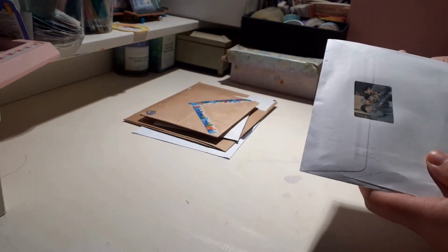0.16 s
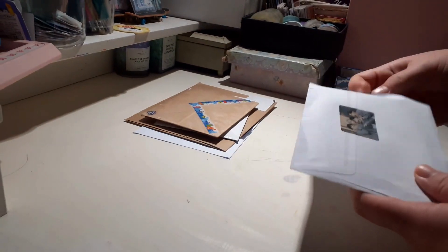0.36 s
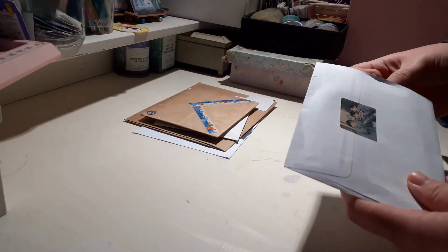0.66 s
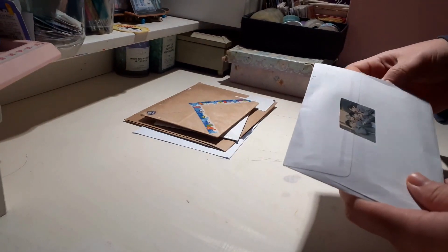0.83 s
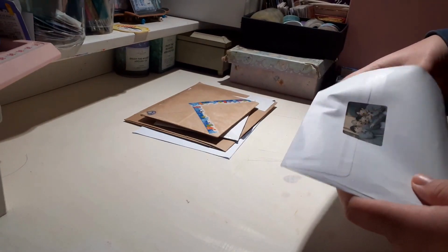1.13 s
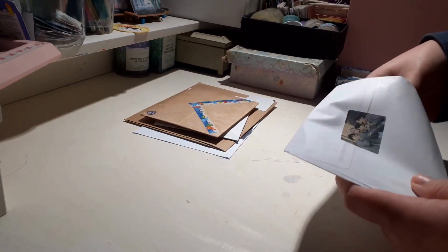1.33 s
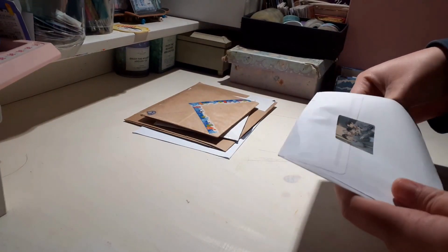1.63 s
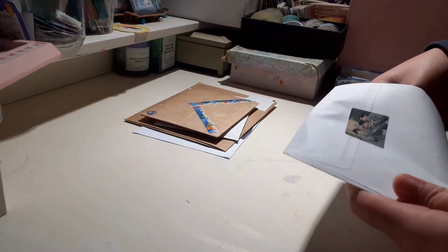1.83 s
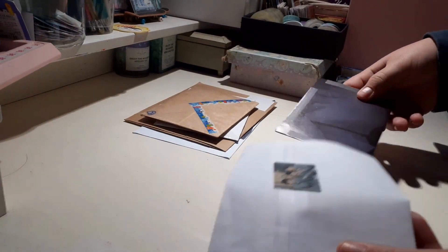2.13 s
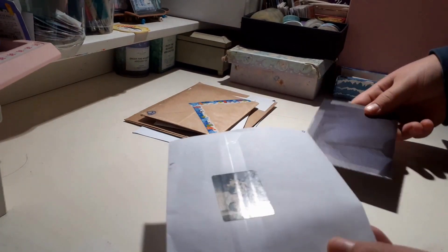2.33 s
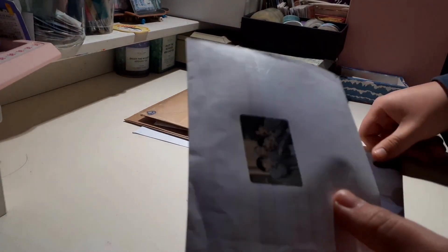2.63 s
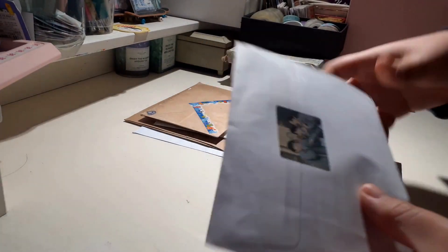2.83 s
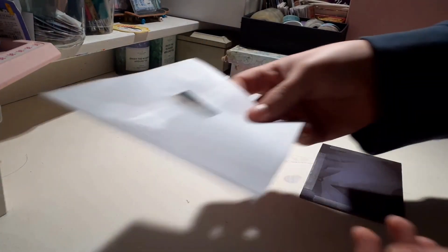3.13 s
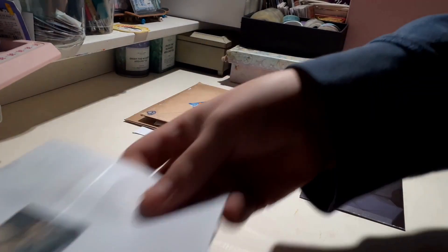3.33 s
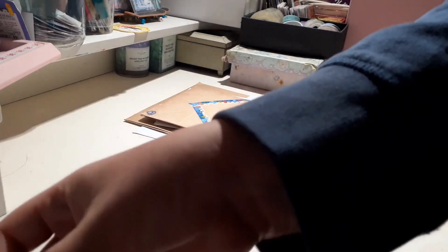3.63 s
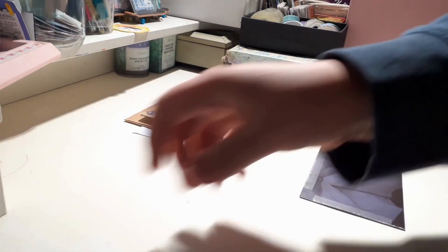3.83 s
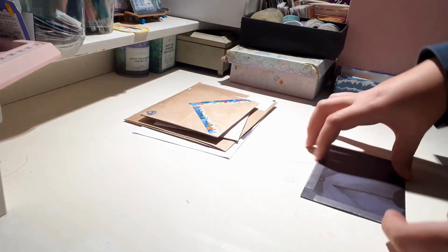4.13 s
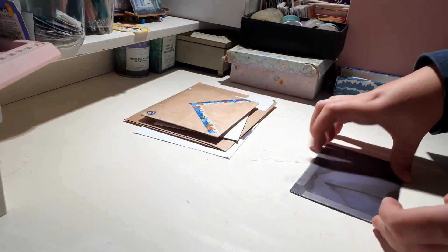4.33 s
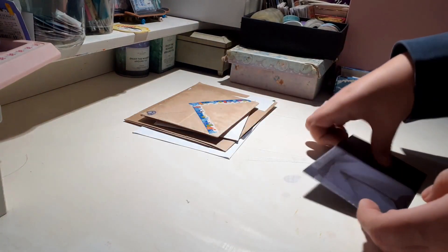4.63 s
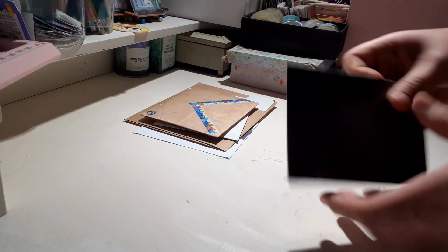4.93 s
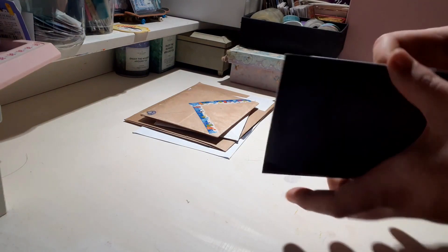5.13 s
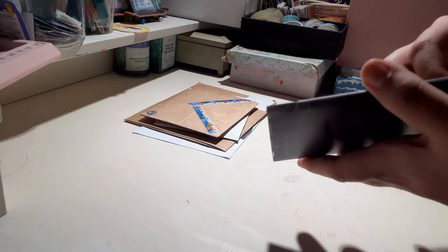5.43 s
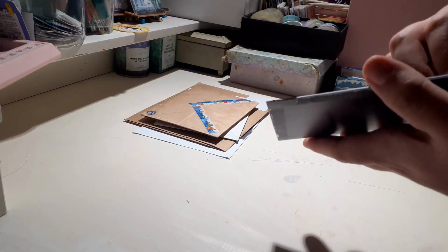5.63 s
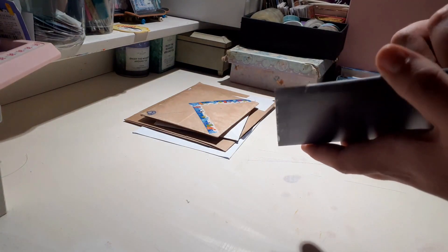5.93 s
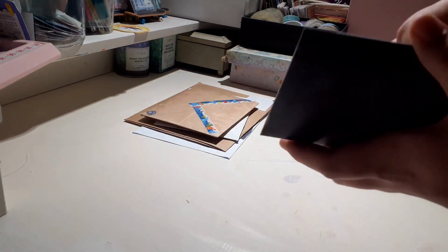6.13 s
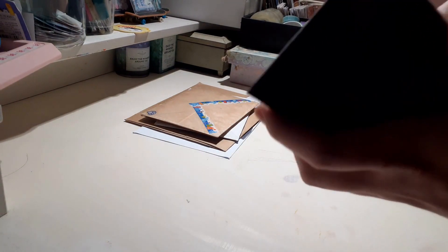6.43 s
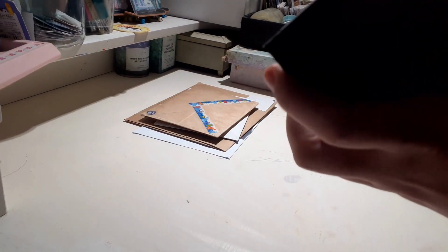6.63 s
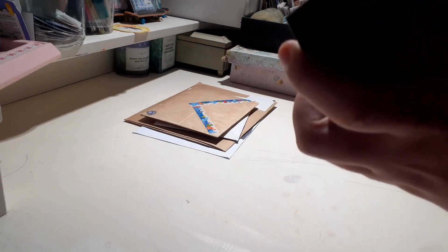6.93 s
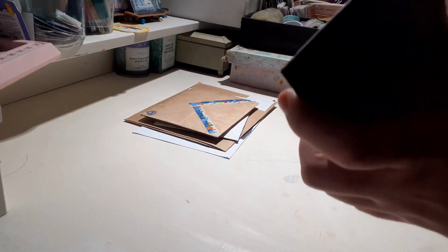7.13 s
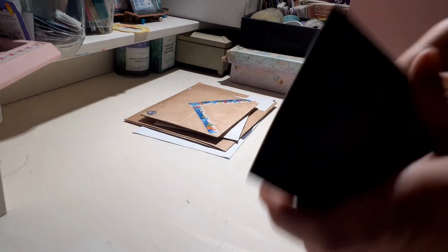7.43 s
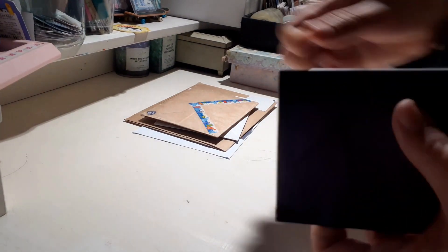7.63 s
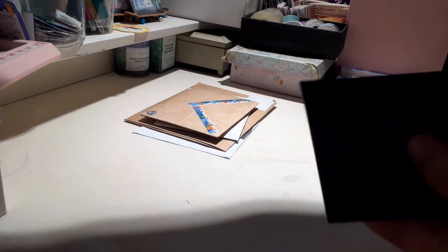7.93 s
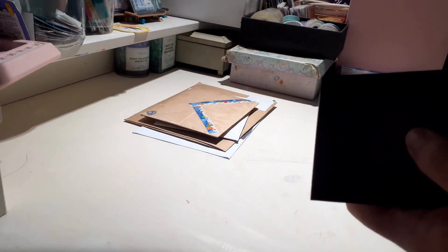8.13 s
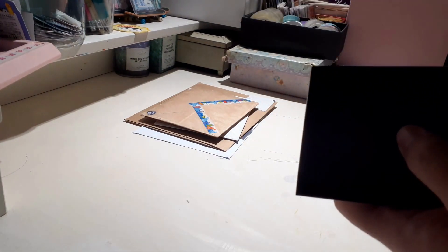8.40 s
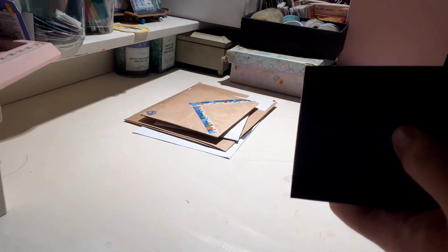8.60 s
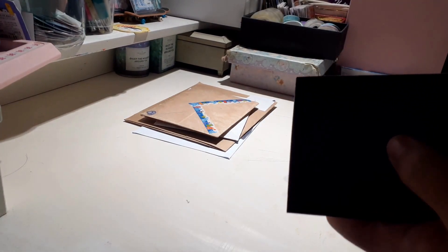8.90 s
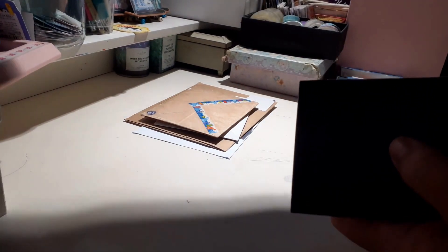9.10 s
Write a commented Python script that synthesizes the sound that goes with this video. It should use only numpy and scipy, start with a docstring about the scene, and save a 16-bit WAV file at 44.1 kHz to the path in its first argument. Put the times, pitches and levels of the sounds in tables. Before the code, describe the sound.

Hands handle an envelope and stiff card at a desk, heard close and in stereo, leaning slightly right. Irregular paper strokes and small snaps come first, strongest around one and two seconds. After a faint cloth brush, the card scrapes off the desk with low thuds and clicks. A quiet stretch leads to brighter rubs, soft finger knocks and a loud edge clack, over steady low room rumble and faint hiss.

```python
"""A stiff card sleeve is drawn out of a paper envelope, dragged off a desk, turned over and tapped, all close by.
First, paper slides with a grainy hiss (noise cut up by random slips) and its creases snap (short noise bursts).
Then the card judders over the wood (slips through desk resonances) and sounds hollow as it is cupped in the hands.
Last, fingertips knock the card and its edge clacks (noise plus ringing modes). Desk thuds (dying sines) come
now and then; a steady low rumble, like a fan, and a faint hiss (filtered noise) fill the small dry room throughout."""
import sys
import numpy as np
from scipy import signal
from scipy.fft import rfft, irfft
from scipy.io import wavfile
from scipy.ndimage import uniform_filter1d

SR = 44100
rng = np.random.default_rng(int(sys.argv[2]) if len(sys.argv) > 2 else 0)


def dump_mix(stems):
    """Bounce the given channels to the path in sys.argv[1] as a 16-bit WAV at rate SR."""
    frames = np.atleast_2d(stems).T  # one column per channel
    limited = np.clip(frames, -1, 1)  # hard clip at full scale
    pcm = np.round(limited * 32767).astype(np.int16)
    wavfile.write(sys.argv[1], SR, pcm)


N = 408366
TIME = np.arange(N) / SR


def gain_of(db):
    """Turns decibels into a factor."""
    return 10 ** (np.asarray(db) / 20)


def evened(x):
    """Scales a signal to rms 1."""
    return x / np.sqrt(np.mean(x ** 2) + 1e-20)


def noise(size):
    """Two unrelated channels of white noise."""
    return rng.standard_normal((2, size))


def read(points, hz):
    """Reads a table between its points, on a log-frequency axis."""
    f, value = np.transpose(points)
    return np.interp(np.log(hz + 1), np.log(f + 1), value)


def add(mix, s, sound):
    """Mixes a stereo sound in at time s."""
    part = mix[:, round(s * SR):][:, :sound.shape[1]]
    part += sound[:, :part.shape[1]]


def add_with_lead(mix, s, lead, sound):
    """Mixes in a sound at time s, with its lead-in ending just there."""
    add(mix, s - lead.shape[1] / SR, lead)
    add(mix, s, sound)


def at_level(x, db, size=N):
    """Gives the first samples of a stereo sound this rms level in the centre."""
    return x * gain_of(db) / np.sqrt(np.mean(x.mean(0)[:size] ** 2) + 1e-20)


def colour(x, *spectra, size=4096):
    """Filters without pre-echo (minimum phase); the gain is the sum of the dB spectra."""
    hz = abs(np.fft.fftfreq(size, 1 / SR))
    log_gain = np.log(gain_of(sum(read(s, hz) for s in spectra)))
    response = np.exp(np.conj(signal.hilbert(log_gain)))
    taps = np.fft.ifft(response).real
    return signal.fftconvolve(x, taps[None, :size // 2], axes=1)[:, :x.shape[1]]


# how alike left and right are, wide in the middle, nearly centred in bass and treble: (f/Hz, likeness from 0 to 1)
LEFT_RIGHT_LIKENESS = [(50, 0.79), (200, 1), (350, 0.9), (700, 0.082), (1500, 0.14), (5500, 0),
                       (7000, 0.87), (9500, 0.97)]


def stereo(x):
    """Two unrelated signals become left and right: wide in the middle, nearly centred in bass and treble."""
    same = np.clip(read(LEFT_RIGHT_LIKENESS, np.fft.rfftfreq(x.shape[1], 1 / SR)), -1, 1)
    mid, side = rfft(x) * np.sqrt([1 + same, 1 - same])
    return irfft(np.array([mid + side, mid - side]), x.shape[1])


# colour of the steady room rumble, before its overall level: (f/Hz, level/dB)
RUMBLE_COLOUR = [(35, -40), (50, -4), (75, -12.5), (110, -6.5), (185, 2.5), (250, -3), (320, 0),
                 (400, -9.5), (540, -21.5), (800, -27), (1500, -42), (3000, -79.5)]
# colour of the microphone's own hiss, before its overall level: (f/Hz, level/dB)
HISS_COLOUR = [(300, -10), (1500, 7), (3000, -0.5), (5700, -4), (6800, -1.5), (8400, 0.5), (10000, -1.5),
               (13000, -1.5)]


def background(rumble_db=-53, hiss_db=-80.5):
    """Steady low room rumble and the microphone's own hiss, both filtered noise."""
    rumble = colour(stereo(noise(N)), RUMBLE_COLOUR, size=16384)
    hiss = colour(stereo(noise(N)), HISS_COLOUR)
    return at_level(rumble, rumble_db) + at_level(hiss, hiss_db)


# how long the room's tail takes to fall by 60 dB: (f/Hz, t60/s)
ROOM_DECAY = [(150, 1), (600, 0.35), (2000, 0.13), (6000, 0.049), (16000, 0.11)]


def room(x, early_db=-13, tail_db=-11):
    """Near reflections from desk and shelves, then a short tail that dies by band."""
    size = SR // 2
    # sparse random echoes, silent for the first 6 ms
    taps = rng.choice([-1., 1.], (2, size)) * (rng.random((2, size)) < 4000 / SR)
    taps[:, :round(.006 * SR)] = 0
    hz, t, z = signal.stft(stereo(taps), SR, nperseg=256)
    decay = gain_of(-60 * t / read(ROOM_DECAY, hz)[:, None])
    tail = signal.istft(z * decay, SR, nperseg=256)[1]

    age = np.arange(tail.shape[1]) / SR
    sparse = rng.random(tail.shape) < 1500 / SR
    early = stereo(noise(tail.shape[1]) * sparse * (age > .001) * np.exp(-age / 0.031))
    echo = gain_of(early_db) * early / np.linalg.norm(early[0])
    echo = echo + gain_of(tail_db) * tail / np.linalg.norm(tail[0])
    return x + signal.fftconvolve(x, echo, axes=1)[:, :N]


def ring(modes, size):
    """Modes that ring and die away, one row each."""
    hz, db, t60 = np.transpose(modes)[:, :, None]
    t = np.arange(size) / SR
    return gain_of(db - 60 * t / t60) * np.exp(2j * np.pi * hz * t)


# resonances of the desk top, levels relative: (f/Hz, level/dB, t60/s)
DESK_MODES = [(56, -25, 0.11), (110, 1.5, 0.21), (172.5, -7, 0.14), (245.6, -6, 0.046), (336, -1.5, 0.11),
              (447.4, -5, 0.071), (620, -18, 0.11)]
# soft blows that reach the desk: (t/s, level/dB, hardness as extra level of the upper modes/dB)
DESK_BLOWS = [(0.961, -50, 0), (1.337, -43.5, 10), (1.967, -45.5, -6), (2.675, -39.5, -4.5),
              (2.966, -45, 6.5), (4.064, -44, -4), (4.425, -38, 11), (4.461, -39, -18), (4.678, -46, 2),
              (7.218, -68, 15), (7.695, -50.5, 2), (8.316, -47.5, 0), (8.676, -41.5, -1),
              (8.706, -44.5, 11), (8.897, -61, 12), (8.91, -40, 3)]


def thuds():
    """The desk top booms; a harder blow wakes more of its modes above 150 Hz."""
    out = np.zeros((2, N))
    modes = ring(DESK_MODES, size=12000).imag
    upper = np.transpose(DESK_MODES)[0] > 150
    onset = 1 - np.exp(-np.arange(modes.shape[1]) / SR / 0.012)  # soft start
    for s, db, hard_db in DESK_BLOWS:
        signs = rng.choice([-1, 1], len(DESK_MODES))
        weights = np.where(upper, gain_of(hard_db) * signs, 1)
        boom = np.tile(onset * (weights @ modes), (2, 1))
        add(out, s, at_level(boom, db, size=1500))
    return out


def grit(count, per_s, spread_db, grain_s):
    """Envelope of random slips: most are tiny, a few are large, each dies at once."""
    sizes = gain_of(spread_db * np.minimum(rng.exponential(1, count), 4))
    slips = (rng.random(count) < per_s / SR) * sizes
    power = signal.lfilter([1], [1, -np.exp(-1 / (grain_s * SR))], slips ** 2)
    return evened(np.sqrt(power))


def swell(t, s, length, db):
    """Power of one hand movement: it speeds up to a crest at time s and slows down again."""
    rise_share, edge_db = 0.48, -11  # part spent speeding up; level of both ends against the crest
    bell = 1.59  # roundness of the crest: 1 pointed, 2 round
    away = np.maximum((s - t) / rise_share, (t - s) / (1 - rise_share)) / length
    return gain_of(db + edge_db * away ** bell) ** 2


# resonances of the wood under the dragged card, levels relative: (f/Hz, level/dB)
WOOD_COLOUR = [(55, -29.5), (105, 10), (170, -4.5), (380, 7), (580, -11.5), (1150, -5), (1700, -13),
               (2600, -17), (3600, -50.5)]
# pulls that drag the card to the desk's edge: (t/s of greatest speed, length/s, level/dB)
DRAG_PULLS = [(4.444, 0.048, -39.5), (4.502, 0.062, -42.5), (4.606, 0.097, -48)]


def drag(start_s=4.424):
    """The card breaks loose and judders across the desk: separate slips ring the wood's resonances."""
    slips = stereo(noise(N)) * grit(N, per_s=700, spread_db=1.5, grain_s=.0005)
    pull = np.sqrt(sum(swell(TIME, *p) for p in DRAG_PULLS))
    return at_level(colour(slips, WOOD_COLOUR), 0) * pull * (TIME > start_s)


# general colour of snaps, clacks and knocks, before each one's own tilt: (f/Hz, level/dB)
SNAP_COLOUR = [(100, -11.5), (300, 4.5), (1500, 0.5), (3000, 0.5), (5500, -1.5), (8300, 1.5), (10000, -7),
               (16000, -2.5)]


def burst(tilt, t60, rise_s, size=6000):
    """A sudden buckle: a quick swell of slips, then the sheet's damped, ragged flutter."""
    t = np.arange(size) / SR
    fall = gain_of(-60 * t / t60) * (1 - np.exp(-t / rise_s))
    ragged = np.sqrt(grit(size, per_s=3500, spread_db=4, grain_s=.001))
    return colour(stereo(noise(size)) * fall * ragged, SNAP_COLOUR, tilt)


def scuff(tilt, t60, db, size=900):
    """Friction builds up as an edge catches, just before it lets go, 16 dB under the event's level."""
    build_up = gain_of(-60 * np.arange(size)[::-1] / SR / t60)
    rub = at_level(colour(stereo(noise(size)), SNAP_COLOUR, tilt), 0)
    return gain_of(db - 16) * rub * build_up


# resonances of the stiff card, levels relative: (f/Hz, level/dB, t60/s)
CARD_MODES = [(740, -9, .035), (980, -1, .035), (2180, -11, .06), (2724, -6, .08), (2978, -5, .06),
              (3308, -3, .03), (3542, -1, .05), (3688, -3, .05), (4215, 1, .045), (5012, 3, .045),
              (5316, 3, .045), (8230, -1, .05)]


def card_ring(slope_db=0):
    """The card's modes, tilted in dB per octave; each has its own phase on the left and on the right."""
    hz = np.transpose(CARD_MODES)[0]
    phases = np.exp(2j * np.pi * rng.random((2, len(CARD_MODES))))
    weights = gain_of(slope_db * np.log2(hz / hz[0])) * phases
    return (weights @ ring(CARD_MODES, size=6000)).imag


# how the soft finger pad dulls the top: (f/Hz, level/dB)
FINGER_PAD = [(4300, 0), (5000, -10)]
# soft knocks on the card, level before the pad dulls it: (t/s, level/dB, slope of its modes/dB per octave)
CARD_KNOCKS = [(7.22, -65, -16), (8.2158, -52, -7.5), (8.298, -63.5, -4), (8.556, -65, -1),
               (8.623, -61.5, -5)]


def knocks(rise_s=.004, t60=.075, grain_db=2):
    """Fingertips ring the card; the softer the touch, the more its low modes lead; the pad dulls the top."""
    out = np.zeros((2, N))
    for s, db, slope_db in CARD_KNOCKS:
        rasp = burst([(1000, 0), (4300, 2 * slope_db)], t60, rise_s)
        onset = 1 - np.exp(-np.arange(rasp.shape[1]) / SR / rise_s)
        modes = card_ring(slope_db) * onset
        touch = at_level(modes, 0, size=441) + at_level(rasp, grain_db, size=441)
        add(out, s, gain_of(db) * colour(touch, FINGER_PAD))
    return out


# the card's edge striking: (t/s, level/dB, low end/dB, top/dB, t60/s)
EDGE_STRIKES = [(8.675, -23.5, -4, 1, 0.025), (8.7143, -37, -4.5, -0.5, 0.016), (8.8956, -45, 21, 5, 0.019),
                (8.9115, -38.5, -7, -3, 0.079)]


def clacks(ring_db=-6):
    """The hard card edge grazes, cracks and rings briefly."""
    out = np.zeros((2, N))
    for s, db, low_db, top_db, t60 in EDGE_STRIKES:
        tilt = [(700, low_db), (1300, -7), (2100, -1.5), (3600, 7.5), (6500, top_db), (8200, top_db + 1.0),
                (9400, top_db - 2.5), (12000, top_db - 2.5), (14500, top_db - 8.5)]
        crack = at_level(burst(tilt, t60, rise_s=0.00059), 0, size=441)
        blow = crack + at_level(card_ring(), ring_db, size=441)
        add_with_lead(out, s, scuff(tilt, t60 / 2, db), at_level(blow, db, size=441))
    return out


# colour of the card sleeve's hollow at full strength: (f/Hz, level/dB)
SLEEVE_HOLLOW = [(1500, -7), (2050, 7), (3000, -11), (4000, 7), (4900, 4), (5900, -8), (8000, 1),
                 (13000, -3)]


def hollow(s, hz):
    """The sleeve resounds while it is cupped in both hands: dB by time and frequency."""
    cupped = np.interp(s, [4.6, 5.8, 7.25, 7.5], [0, 0.28, 0.91, 0.0])
    return np.multiply.outer(cupped, read(SLEEVE_HOLLOW, hz))


# creases snapping and edges ticking: (t/s, level/dB, resonance of the bent patch f/Hz, crisp top/dB, t60/s)
CREASE_SNAPS = [(0.084, -46, 5260, 10, 0.07), (0.3736, -44.5, 1470, -4, 0.031),
                (0.5609, -46.5, 1240, -1, 0.052), (0.7243, -59, 970, -6, 0.033),
                (0.7414, -47, 2580, -12, 0.017), (0.988, -49, 1190, -18, 0.017),
                (1.296, -51.5, 2280, -6, 0.019), (1.3066, -43.5, 7900, 7, .01),
                (1.308, -43, 1000, -0.5, 0.022), (1.5886, -43, 1800, -6, 0.016),
                (1.8963, -38.5, 1730, 0, 0.026), (1.961, -46.5, 1440, -7, 0.029),
                (2.021, -47, 1220, 1, 0.036), (2.6888, -53, 930, -8.5, 0.068),
                (2.959, -47.5, 780, -5, 0.067), (2.9686, -43, 1300, -13, 0.046),
                (2.974, -46.5, 2250, -3.5, 0.019), (2.9992, -36.5, 1560, -34, 0.008),
                (3.045, -49.5, 2470, -13, 0.012), (3.1276, -54, 1290, -35, 0.024),
                (3.1744, -47, 1260, -19, 0.035), (3.176, -58.5, 4500, -14, 0.024),
                (3.5177, -54.5, 815, -23, 0.013), (4.4255, -47.5, 613, -14, 0.089),
                (4.572, -43.5, 2400, 4.5, 0.016), (4.6635, -40.5, 2830, 5.5, 0.023),
                (4.7185, -39, 2630, -7.5, 0.038), (6.5952, -55, 2230, 8, 0.036),
                (6.7428, -50, 8350, 15, 0.015), (7.2203, -52.5, 1910, -13, 0.01), (7.7, -50, 900, 6, 0.017)]


def snaps(body_db=12, octaves=0.38):
    """Creases pop and fingers tick on edges; each patch has one broad resonance and radiates little below it."""
    out, hz = np.zeros((2, N)), np.geomspace(50, 16000, 80)
    for s, db, body_hz, top_db, t60 in CREASE_SNAPS:
        body = body_db / (1 + (np.log2(hz / body_hz) / octaves) ** 2)
        weak_bass = -10 * np.log10(1 + (body_hz / (4 * hz)) ** 2)
        top = read([(1.6 * body_hz, 0), (3 * body_hz, top_db)], hz)
        tilt = np.transpose([hz, body + weak_bass + top + hollow(s, hz)])
        lead = scuff(tilt, 2 * t60, db)
        add_with_lead(out, s, lead, at_level(burst(tilt, t60, rise_s=0.0001), db, size=441))
    return out


def crinkles(count=8, pops_per_s=220, spread_db=3.2, db=-11):
    """Small patches of the sheet pop at random, each with a few cycles at its own pitch."""
    t, out = np.arange(512) / SR, np.zeros((2, N))
    for hz in np.geomspace(1590, 4870, count):
        at = rng.integers(0, N, round(pops_per_s * N / SR / count))
        sizes = gain_of(spread_db * np.minimum(rng.exponential(1, len(at)), 3))
        pops = np.zeros((2, N))
        pops[:, at] = sizes * rng.choice([-1, 1], (2, len(at)))
        ping = np.sin(2 * np.pi * hz * t) * np.exp(-hz * t / 2.1)  # fades to about a third in 2.1 cycles
        out += signal.oaconvolve(pops, ping[None], axes=1)[:, :N]
    return at_level(stereo(out), db)


# lowest resonance of the free part of the sheet, which moves with the grip: (t/s, f/Hz)
FREE_SHEET_PITCH = [(0.74, 700), (0.86, 2400), (0.99, 1300), (1.14, 2230), (1.31, 920), (1.93, 1490),
                    (4.62, 1107), (4.7, 2500), (5.2, 1500)]


def free_sheet(s, hz, damping=.6, leak_db=-13):
    """The free part of the sheet resounds at its lowest mode and radiates little below it: dB by time and f."""
    ratio = hz / np.interp(s, *np.transpose(FREE_SHEET_PITCH))[:, None]
    power = ratio ** 4 / ((1 - ratio ** 2) ** 2 + (damping * ratio) ** 2)
    return 10 * np.log10(power + gain_of(leak_db) ** 2)


# strokes of paper, card or a finger sliding:
# (t/s of greatest speed, length/s, level/dB, brightness as treble over body/dB)
SLIDE_STROKES = [(0.338, 0.071, -55, -13), (0.403, 0.029, -39.5, -5), (0.496, 0.039, -41, -4),
                 (0.558, 0.028, -50.5, -12), (0.669, 0.041, -55, 3.5), (0.757, 0.059, -49.5, -2),
                 (0.878, 0.1, -50, -9.5), (0.948, 0.16, -46.5, -0.5), (1.074, 0.073, -36, -0.5),
                 (1.148, 0.027, -34, 8), (1.162, 0.056, -33, -0.5), (1.249, 0.046, -48, 1.5),
                 (1.365, 0.12, -44.5, 0), (1.595, 0.047, -44, -7), (1.726, 0.16, -46.5, 5),
                 (1.948, 0.135, -37.5, 6), (2.119, 0.12, -50.5, 0), (2.244, 0.13, -59, -3.5),
                 (2.398, 0.52, -70, 4), (2.551, 0.25, -56.5, 2.5), (3.013, 0.065, -48, 2.5),
                 (3.226, 0.16, -62, 1.5), (3.596, 0.097, -59.5, 7.5), (4.15, 0.054, -53.5, 6),
                 (4.209, 0.076, -55, 0.5), (4.363, 0.061, -56, 5.5), (4.483, 0.15, -56, 1),
                 (4.616, 0.067, -51.5, -4.5), (4.735, .058, -44.5, 0), (5.106, 0.27, -55, 12),
                 (6.076, 0.18, -73.5, 2.5), (6.362, 0.13, -69.5, -6.5), (6.613, 0.041, -65.5, -4),
                 (6.775, 0.053, -62.5, -0.5), (7.238, 0.031, -49.5, 14.5), (7.411, 0.073, -58.5, 14),
                 (7.54, 0.044, -47.5, 12), (7.633, 0.21, -56.5, 9), (8.663, 0.017, -54, -3),
                 (8.706, 0.1, -49, -7)]
# the coat sleeve brushing as the arm reaches across the desk and draws back: (t/s, level/dB)
ARM_BRUSH = [(0, -77), (2.4, -69), (2.62, -66.5), (2.76, -80), (3.2, -70.5), (3.52, -65), (3.68, -72),
             (3.8, -64), (4.05, -69), (4.6, -77.5), (7.3, -86), (7.85, -71), (8.5, -82)]


def contact(t, cloth_bright_db=10.5, uneven_db=1.4, uneven_s=0.02):
    """Level and brightness (dB) of all that slides at times t; the strongest contact sets the colour."""
    powers = [swell(t, s, length, db) for s, length, db, _ in SLIDE_STROKES]
    powers.append(gain_of(np.interp(t, *np.transpose(ARM_BRUSH))) ** 2)
    brights = [bright_db for *_, bright_db in SLIDE_STROKES] + [cloth_bright_db]
    total = np.sum(powers, axis=0)
    keep = np.exp(-t[1] / uneven_s)  # t[1] is the time step
    waver = evened(signal.lfilter([1], [1, -keep], rng.standard_normal(len(t))))
    return 10 * np.log10(total) + uneven_db * waver, np.dot(brights, powers) / total


def drifting(shape, steps, bins):
    """Random map over time and frequency, smoothed over so many steps and bins."""
    smooth = uniform_filter1d(rng.standard_normal(shape), size=steps, axis=0)
    return evened(uniform_filter1d(smooth, size=bins, axis=1))


# basic colour of the sliding hiss, before its changes: (f/Hz, level/dB)
PAPER_COLOUR = [(45, 2), (110, 14), (330, 15), (650, -2), (1400, -4), (2400, -3), (3800, -1.5), (5000, 1),
                (7000, -1), (8500, 0), (10000, -7.5), (12300, -4), (16000, -6)]


def sliding(shelf_hz=5600, patchy_db=2.1, flex_db=2.5):
    """Fibres catch and slip; bending shifts resonances; each stroke has its brightness, duller ones crinkle more."""
    hz, t, z = signal.stft(stereo(noise(N)), SR, nperseg=512)
    level_db, bright_db = contact(t)
    treble = bright_db[:, None] / (1 + (shelf_hz / (hz + 1)) ** 5)
    patches = patchy_db * drifting((len(t), len(hz)), steps=6, bins=5)
    flex = flex_db * drifting((len(t), len(hz)), steps=12, bins=20)  # slow, broad changes as the sheet bends
    resonance = free_sheet(t, hz) + hollow(t, hz)
    shape = gain_of(read(PAPER_COLOUR, hz) + treble + resonance + patches + flex)
    shape /= np.linalg.norm(shape, axis=1, keepdims=True)  # colour only: level comes last
    hiss = signal.istft(z * shape.T, SR, nperseg=512)[1][:, :N]
    slips = grit(N, per_s=3000, spread_db=2.4, grain_s=.0006)
    dullness = gain_of(-np.maximum(np.interp(TIME, t, bright_db), 0))  # 1 when dull, less when bright
    grainy = at_level(hiss * slips, 0) + dullness * crinkles()
    return grainy * gain_of(np.interp(TIME, t, level_db))


def scene():
    """All the handling sounds in the room, with the desk's thuds and the background added."""
    handling = sliding() + snaps() + clacks() + knocks() + drag()
    return room(handling) + thuds() + background()


# balance of left and right: (f/Hz, left minus right level/dB)
STEREO_BALANCE = [(150, -1.5), (300, -2.5), (600, -6.5), (1500, -1.5), (5000, -2.5), (8000, -4.5),
                  (10000, 0.4)]


def record(dry):
    """The right is a little louder over most of the range; then a low-pass limits the band."""
    lean_db = read(STEREO_BALANCE, np.fft.rfftfreq(N, 1 / SR)) / 2
    heard = irfft(rfft(dry) * gain_of([lean_db, -lean_db]), N)
    low_pass = signal.firwin(511, 15950, window=("kaiser", 9), fs=SR)  # cutoff in Hz
    return signal.oaconvolve(heard, low_pass[None], "same")


dry = scene()
out = record(dry)
dump_mix(out)
```